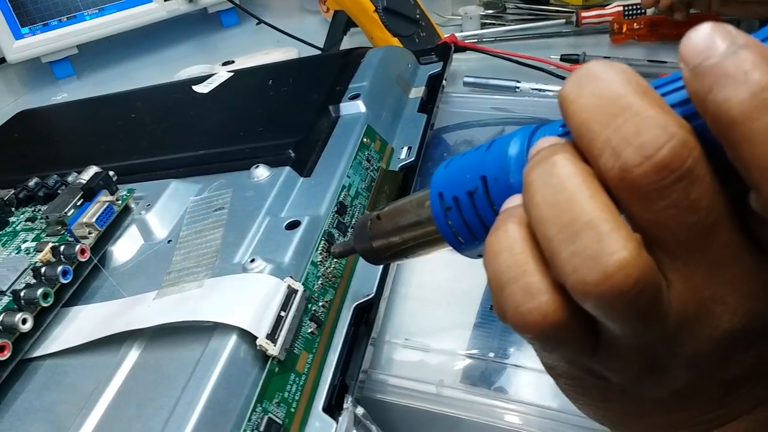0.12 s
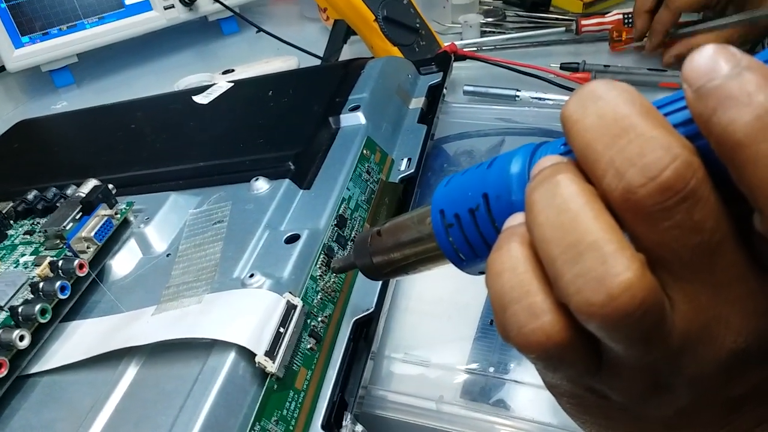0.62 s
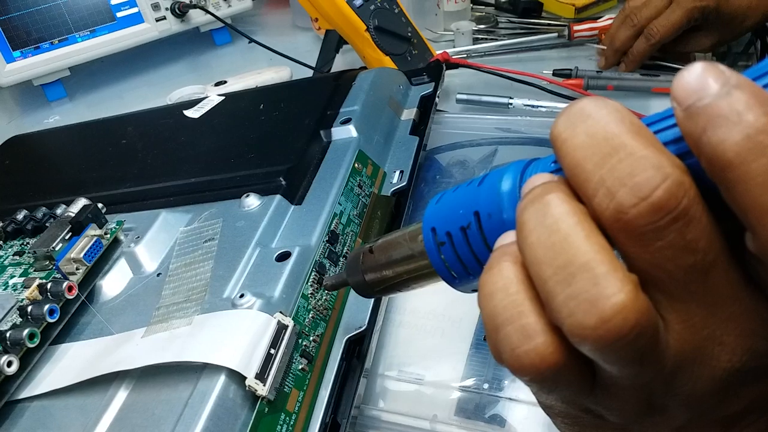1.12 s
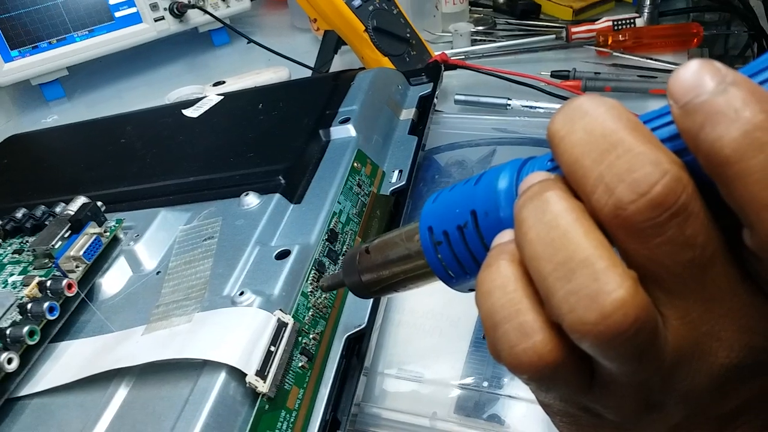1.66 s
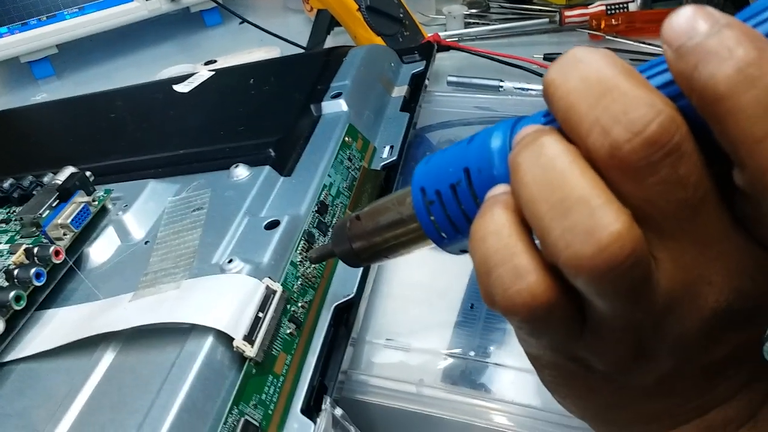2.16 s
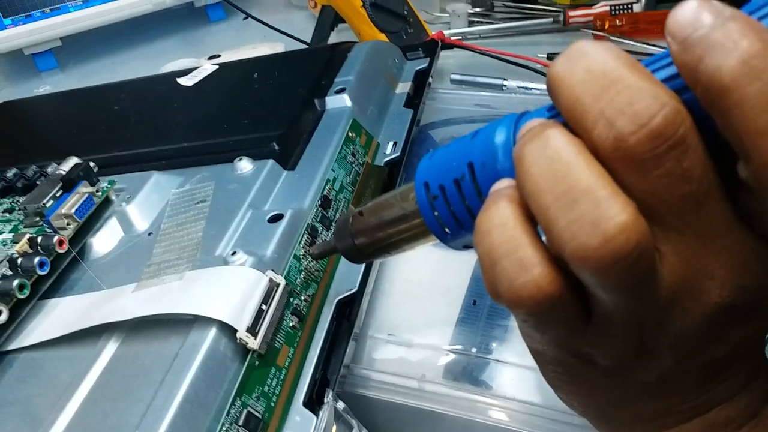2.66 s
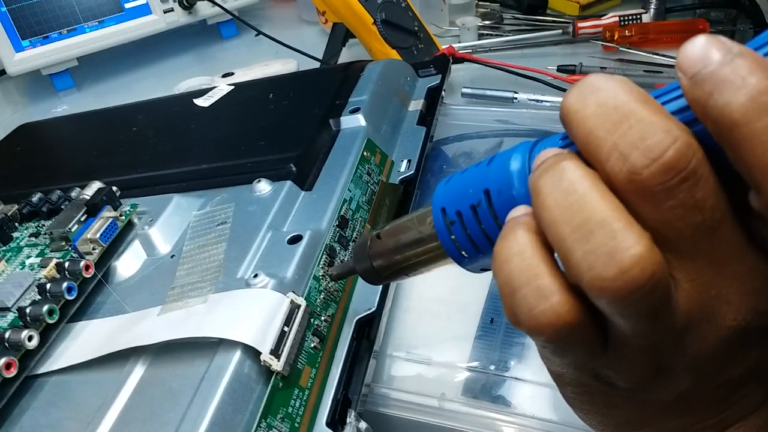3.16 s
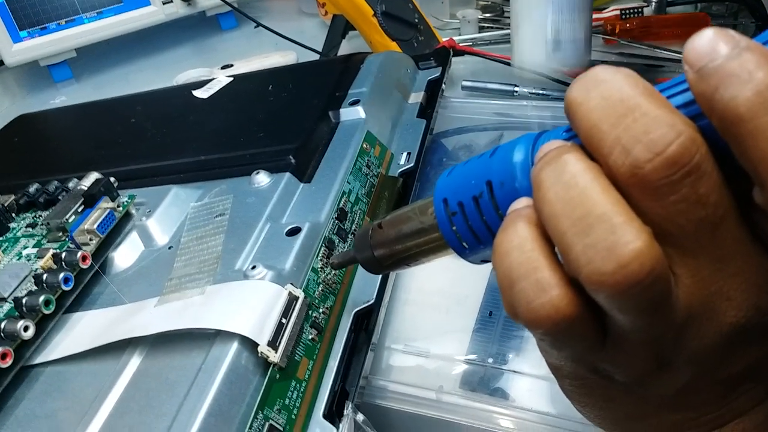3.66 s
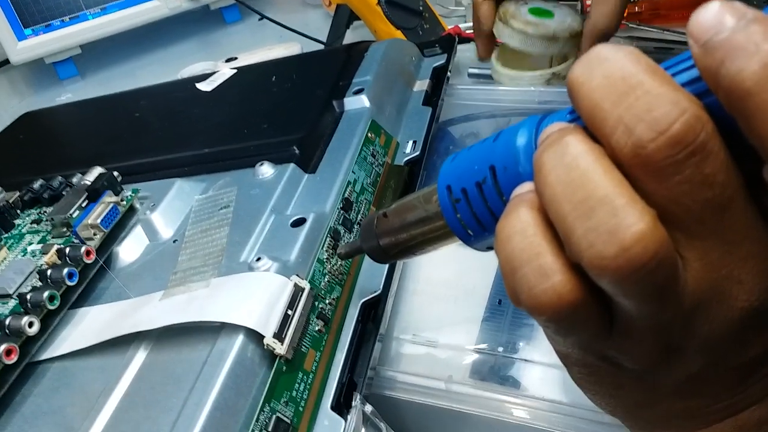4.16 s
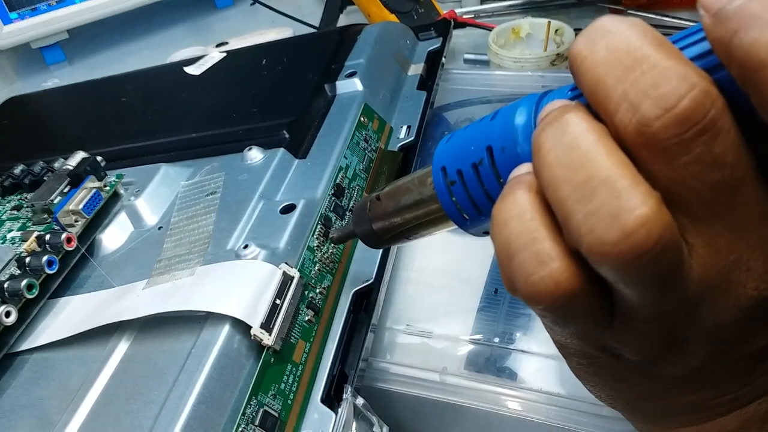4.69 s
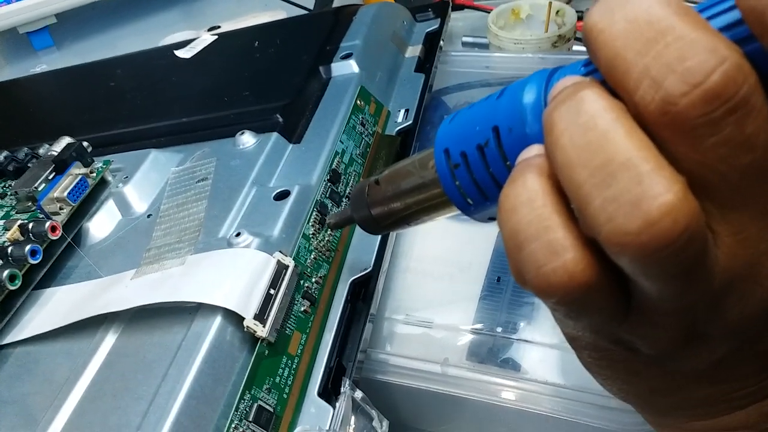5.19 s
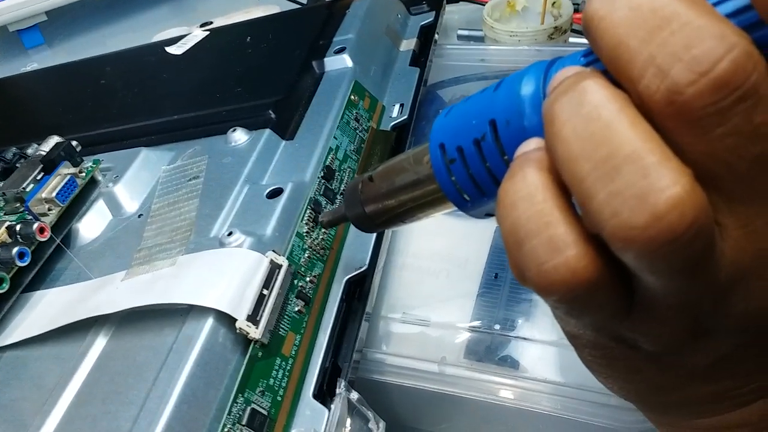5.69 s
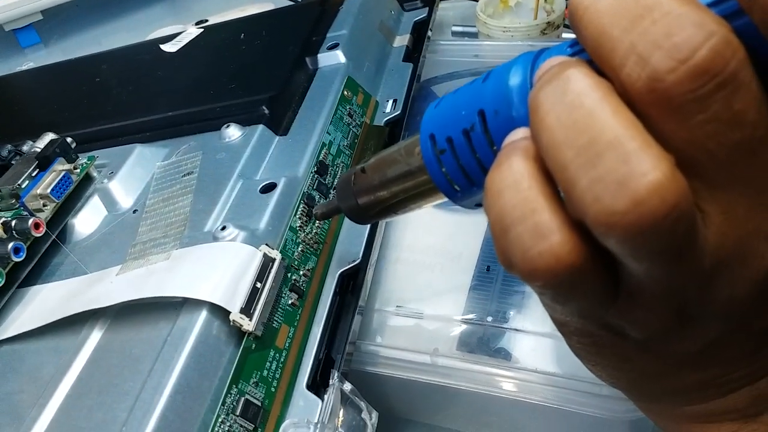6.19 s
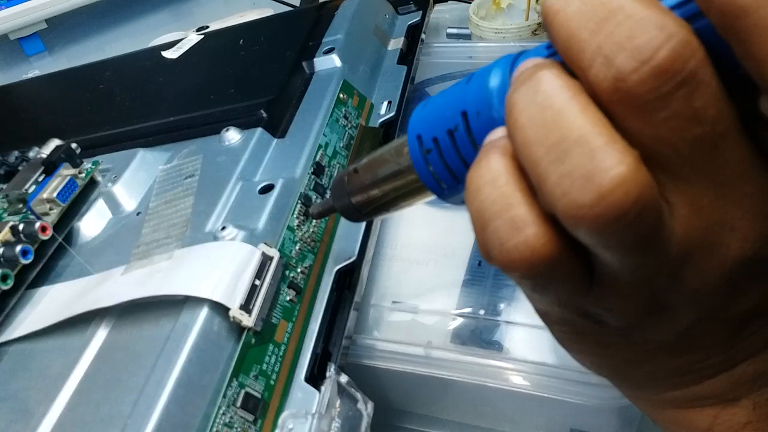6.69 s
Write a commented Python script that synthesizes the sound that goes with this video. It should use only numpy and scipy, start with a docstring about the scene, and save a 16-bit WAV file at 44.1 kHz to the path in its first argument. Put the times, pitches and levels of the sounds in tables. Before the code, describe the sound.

Quiet constant airy hiss with a thin motor whine; one bright metal clatter, soft sliding and ticks, later hollow plastic knocks indoors.

```python
"""A hot air gun hisses throughout: noise for its jet, noise in narrow bands for its whistles, sines for its motor.
From 0.24 s a steel tool is picked up; near 0.93 s it clatters, as noise bursts and rattling touches that ring it.
From about 1.6 s things slide over the bench as swelling noise; near 2 s one drags, and from 2.57 s small ticks sound.
At 3.9 s a plastic jar is set down and at 4.9 s its lid is handled: bursts that ring the modes, each with rebounds.
Two microphone ports in a small room hear it all; the left is mostly duller, weaker and a little later."""
import sys
import numpy as np
from scipy import signal
from scipy.fft import rfft, irfft, next_fast_len
from scipy.io import wavfile

SR = 44100
rng = np.random.default_rng(int(sys.argv[2]) if len(sys.argv) > 2 else 0)


def to_wav(sig):
    """Store sig (one row per channel, or 1-D mono) as 16-bit WAV at the path in sys.argv[1].

    Samples outside -1..1 are clipped; the rate is SR.
    """
    pcm = np.clip(np.atleast_2d(sig), -1, 1) * 32767
    pcm = np.round(pcm).astype(np.int16)
    wavfile.write(sys.argv[1], SR, pcm.T)  # frames by channels


def gain_from_db(level_db):
    """Convert decibel levels to linear amplitude factors (20 dB per decade)."""
    decades = np.asarray(level_db, float) / 20
    return 10 ** decades


N = 301101   # length of the scene in samples
LEFT_LAG_S = 0.00018   # how much later the left port hears the shared noise and the motor


def rms_one(x):
    """Scales a sound to an rms of 1."""
    return x / np.sqrt(np.mean(x ** 2) + 1e-20)


def at_hz(points, hz):
    """Reads a curve of (frequency, value) points at any frequency, on a log frequency axis."""
    points_hz, values = np.transpose(points)
    return np.interp(np.log(hz + 1), np.log(points_hz), values)


def coloured(x, gains):
    """Filters a sound with a gain per frequency, given as a function of Hz."""
    size = next_fast_len(x.shape[-1])
    spectrum = rfft(x, size) * gains(np.fft.rfftfreq(size, 1 / SR))
    return irfft(spectrum, size)[..., :x.shape[-1]]


def band(x, low_hz, high_hz):
    """Keeps one range of frequencies."""
    return signal.sosfilt(signal.butter(2, [low_hz, high_hz], "band", fs=SR, output="sos"), x)


def without_bass(x, cut_hz, order=2):
    """Weakens everything below the cut."""
    return signal.sosfilt(signal.butter(order, cut_hz, "high", fs=SR, output="sos"), x)


def drift(rate_hz):
    """A slow random wander with a spread of about 1, made from 40 smoothed random points a second."""
    knots = rng.standard_normal(int(N / SR * 40) + 2)
    memory = np.exp(-2 * np.pi * rate_hz / 40)
    smooth = rms_one(signal.lfilter([1], [1, -memory], knots))
    return np.interp(np.arange(N) * 40 / SR, np.arange(len(knots)), smooth)


def swells(rows):
    """Sum of gains that each climb 20 dB in a rise time and drop 20 dB in a fall time (2 ms at least)."""
    t = np.arange(N) / SR
    total = 0
    for s, db, rise_s, fall_s in rows:
        before, after = (s - t) / max(rise_s, 0.002), (t - s) / max(fall_s, 0.002)
        total = total + gain_from_db(db - 20 * np.maximum(before, after))
    return total


def placed(x, left_db, lag_s):
    """Straight path to the ports: the left one hears the sound weaker and later."""
    return np.array([gain_from_db(left_db) * np.roll(x, round(lag_s * SR)), x])


# how alike noise is at the two ports: (frequency [Hz], share of the power common to both [0-1])
PORT_LIKENESS = [(60, 0.84), (150, 0.79), (400, 0.77), (1000, 0.88), (2500, 0.11), (6000, 0.11),
                 (15000, 0.1)]


def two_ports(size):
    """Noise at both ports: a common share, late on the left, plus a share of each port's own."""
    common, own = rng.standard_normal(size), rng.standard_normal((2, size))

    def share(hz):
        return np.clip(at_hz(PORT_LIKENESS, hz), 0, 1)

    def late(hz):
        return np.sqrt(share(hz)) * np.exp(-2j * np.pi * hz * [[LEFT_LAG_S], [0]])

    return coloured(common, late) + coloured(own, lambda hz: np.sqrt(1 - share(hz)))


# tone colour of the air jet: (frequency [Hz], relative level per Hz [dB])
JET_COLOUR = [(30, -40), (55, -12.5), (113, -13.5), (257, -14), (450, -6.5), (1100, -4.5), (1650, -5.5),
              (2040, -14.5), (3200, -7.5), (3800, -4), (4700, -12), (6000, -13.5), (11000, -24),
              (15800, -29.5)]
# slow swell of the jet's hiss: (time [s], level [dB])
JET_LEVEL = [(0, -54), (1.5, -55.5), (3.5, -56), (5.3, -53.5), (6.83, -55.5)]
# nozzle resonances blown by the jet: (frequency [Hz], width [Hz], level [dB])
NOZZLE_WHISTLES = [(111.4, 48, -73.5), (2679, 296, -57.5), (4200, 630, -65.5), (6700, 600, -65.5),
                   (9770, 300, -81), (10520, 260, -77.5)]


def jet():
    """Turbulent air is smooth noise; in each nozzle resonance it becomes a wavering whistle."""
    s, db = np.transpose(JET_LEVEL)
    swell_db = np.interp(np.arange(N) / SR, s, db)
    hiss = rms_one(coloured(two_ports(N), lambda hz: gain_from_db(at_hz(JET_COLOUR, hz))))
    out = gain_from_db(swell_db + 0.8 * drift(2.2)) * hiss
    air = two_ports(N)
    for centre_hz, width_hz, db in NOZZLE_WHISTLES:
        blown = coloured(air, lambda hz: 1 / (1 + (2 * (hz - centre_hz) / width_hz) ** 2))
        out += gain_from_db(db + 1.8 * drift(7.9)) * rms_one(blown)
    return out


# rotor and blade tones of the blower motor: (frequency [Hz], level [dB])
MOTOR_TONES = [(107.5, -82.5), (1287, -117), (1717, -68.5), (2143, -70), (2573, -68), (3542, -63),
               (6697, -78)]


def motor():
    """Rotor and blades hum as sines that share one slightly wandering speed."""
    clock = np.cumsum(1 + 0.0011 * drift(0.464)) / SR - np.array([[LEFT_LAG_S], [0]])
    out = np.zeros((2, N))
    for hz, db in MOTOR_TONES:
        tone = np.sin(2 * np.pi * (hz * clock + rng.random()))
        out += np.sqrt(2) * gain_from_db(db + 1.7 * drift(3.8)) * tone
    return gain_from_db([[-5.0], [0]]) * out   # the motor sits on the right


def ring(clicks, hz, t60_s):
    """A resonance: each unit click starts a sine of about height 1 that fades by 60 dB in t60."""
    r, w = gain_from_db(-60 / (t60_s * SR)), 2 * np.pi * hz / SR
    return signal.lfilter([0, np.sin(w)], [1, -2 * r * np.cos(w), r * r], clicks + 1e-18)


# four ranges of a contact, in order thud, knock, clack, clink: (low edge [Hz], high edge [Hz])
CONTACT_RANGES = [(260, 600), (600, 1250), (1400, 5500), (7500, 15500)]


def struck(hits, modes, crack_s, ring_db):
    """Each contact is a gritty burst in four ranges that builds and fades, and rings the modes of each range."""
    size = 6000
    out, t = np.zeros(N), np.arange(size) / SR
    tops_hz = [high for low, high in CONTACT_RANGES]
    for s, hit_db, *range_db in hits:
        burst = rng.standard_normal(size) * t * np.exp(-t / crack_s)
        start = round(s * SR)
        here = slice(start, start + size)
        for (low, high), db in zip(CONTACT_RANGES, range_db):
            crack = band(band(burst, low, high), low, high)
            out[here] += gain_from_db(hit_db + db) * crack / np.abs(crack).max()
        for hz, mode_db, t60_s in modes:
            tone = ring(burst, hz, t60_s)
            db = range_db[np.searchsorted(tops_hz, hz)] + mode_db + ring_db
            luck_db = 3.5 * rng.standard_normal()   # no two contacts ring alike
            out[here] += gain_from_db(hit_db + db + luck_db) * tone / np.abs(tone).max()
    return out


# steel tool contacts: (time [s], level [dB], heft: extra for the three lower ranges [dB])
TOOL_CONTACTS = [(.243, -56, 3), (0.917, -27, -23), (.927, -5, 2), (.939, -26, -12), (.974, -10.5, 1),
                 (1.105, -38.5, 17)]
# a plain contact of the tool: relative level of thud, knock, clack, clink [dB]
TOOL_RANGES = [-31, -15.5, -12, 0]
# ringing modes of the steel tool: (frequency [Hz], relative level [dB], time to fade 60 dB [s])
TOOL_MODES = [(257, -0.5, 0.078), (795, -4, 0.082), (5500, -11, 0.038), (6060, -15, 0.039),
              (9000, -2, 0.11), (9300, -21, 0.059), (10000, -12, .06), (10780, -4, .07), (10600, -17, .07),
              (11000, 1.5, 0.055), (11610, -28, 0.064), (11840, -22.5, .1), (13300, -10, 0.0395),
              (13960, -19, .06)]


def tool_contacts():
    """The steel tool is struck: short bursts set its modes ringing."""
    hits = []
    for s, db, heft_db in TOOL_CONTACTS:
        hits.append((s, db, *(TOOL_RANGES + heft_db * np.array([1, 1, 1, 0]))))
    return struck(hits, TOOL_MODES, crack_s=0.0015, ring_db=-15.5)


# how long the room rings: (frequency [Hz], time to fade 60 dB [s])
ROOM_FADE = [(100, 0.49), (500, 0.31), (3000, 0.3), (8000, 0.17), (15000, 0.22)]


def room(x):
    """Walls return dense reflections: noise that builds up quickly and dies away at its own pace in each band."""
    t, noise, echo = np.arange(SR // 2) / SR, two_ports(SR // 2), 0
    edges_hz = np.append(60 * 2 ** np.arange(8), 17000)
    for low, high in zip(edges_hz, edges_hz[1:]):
        fade_s = at_hz(ROOM_FADE, np.sqrt(low * high))
        echo = echo + band(noise, low, high) * gain_from_db(-60 * t / fade_s)
    echo = echo * (1 - np.exp(-t / 0.0014))
    echo = echo / np.sqrt(np.sum(echo ** 2) / 2)
    return signal.oaconvolve(x[None], echo, axes=1)[:, :N]


# the tool rattles among other tools: (time [s], level [dB], rise [s], fall [s]), each over 20 dB
RATTLE_SWELLS = [(.932, -26.5, 0.017, 0.097), (1.04, -50.5, .15, 0.053), (1.11, -47.5, 0.025, 0.014)]
# the only stretch with rattling touches: start [s], end [s]
RATTLE_SPAN = (.918, 1.14)
# tone colour of the crash: (frequency [Hz], relative level per Hz [dB])
CRASH_COLOUR = [(100, 6), (250, -24), (800, 0.5), (1500, 10), (3000, 4), (5000, 10.5), (8000, 12.5),
                (11000, -9.5), (16000, 8)]


def rattle():
    """Dense uneven touches are heard as a crash and through the modes of the tool."""
    touches_per_s, ring_db = 6700, -33.0
    start, stop = (round(s * SR) for s in RATTLE_SPAN)
    size = stop - start
    happens = rng.random(size) < touches_per_s / SR
    strength = gain_from_db(2.2 * np.minimum(rng.exponential(1, size), 3))
    touches = np.zeros(N)
    touches[start:stop] = rms_one(happens * strength * rng.choice([-1, 1], size))
    touches *= swells(RATTLE_SWELLS)
    out = coloured(touches, lambda hz: gain_from_db(at_hz(CRASH_COLOUR, hz)))
    for hz, db, t60_s in TOOL_MODES:
        out = out + gain_from_db(db + ring_db) * ring(touches, hz, t60_s)
    return out


def gripped(tool):
    """A hand closes on the tool: from 0.93 s its sound sinks by 4.5 dB within 15 ms."""
    grip = np.clip((np.arange(N) / SR - 0.93) / 0.015, 0, 1)
    return tool * gain_from_db(-4.5 * grip)


# things sliding and scuffing over the bench: (time [s], level [dB], rise [s], fall [s]), each over 20 dB
SLIDE_SWELLS = [(1.61, -65.5, 0.057, 0.18), (1.694, -55.5, 0.11, 0.14), (1.87, -60, 0.13, 0.16),
                (2.202, -58.5, .11, 0.1), (2.578, -56, 0.023, 0.066), (2.9, -66.5, 0.25, 0.33),
                (2.98, -59.5, 0.034, .15), (3.158, -53.5, 0.05, 0.077), (3.93, -68.5, 0.022, .3),
                (4.02, -62, 0.24, 0.055), (4.964, -47, 0.014, 0.088)]
# tone colour of the sliding: (frequency [Hz], relative level per Hz [dB])
SLIDE_COLOUR = [(100, -7), (500, 1.5), (1400, -2), (2700, 2), (5000, 3), (8000, -4), (10300, -7.5),
                (13000, -11), (16000, -14)]


def slides():
    """Friction is swishing noise that swells and fades with each movement."""
    grit = coloured(two_ports(N), lambda hz: gain_from_db(at_hz(SLIDE_COLOUR, hz)))
    grit /= np.std(band(grit, 8500, 14000))   # the levels count in this treble range
    return swells(SLIDE_SWELLS) * grit


# scrape of a heavier drag: (time [s], level [dB], rise [s], fall [s]), each over 20 dB
SCRAPE_SWELLS = [(1.88, -60, .04, .2), (1.985, -56, .2, 0.035), (2.154, -67, 0.085, .12)]
# the bench shaking under it: (time [s], level [dB], rise [s], fall [s]), each over 20 dB
RUMBLE_SWELLS = [(1.985, -56.5, 0.19, 0.38)]


def drag():
    """A heavier thing scrapes in the middle range and shakes the bench in a lower, longer rumble."""
    shake = two_ports(N)
    scrape = swells(SCRAPE_SWELLS) * rms_one(band(shake, 480, 960))
    rumble = swells(RUMBLE_SWELLS) * rms_one(band(shake, 97, 320))
    return scrape + rumble


# dry ticks of a small part: (time [s], level [dB])
TICK_TIMES = [(2.569, -26.5), (2.574, -42), (2.979, -41)]
# a tick: relative level of thud, knock, clack, clink [dB]
TICK_RANGES = [-26.5, -17.5, -17.5, 1]


def ticks():
    """A small part makes very short, mostly bright bursts without any ringing."""
    hits = [(s, db, *TICK_RANGES) for s, db in TICK_TIMES]
    return struck(hits, [], crack_s=0.00026, ring_db=0)


def rocking(blows, loss_above_db):
    """A blow and two rebounds, strongest near the range of its hardness, weaker and softer each time."""
    loss_below_db, bench_thud_db, clink_db = 11.5, -21.5, -39   # plastic hardly clinks
    rows, ranges = [], np.arange(3)
    for s, db, hardness, loss_db, softening in blows:
        for k in range(3):
            away = ranges - (hardness - k * softening)
            range_db = np.where(away < 0, loss_below_db * away, -loss_above_db * away)
            range_db[0] = max(range_db[0], bench_thud_db)   # even a hard blow shakes the bench this much
            rebound_s = 0.0117 * k * 0.95 ** k
            rows.append((s + rebound_s, db - k * loss_db, *range_db, clink_db))
    return rows


# the jar is set down: (time [s], level [dB], hardness [0 thud, 1 knock, 2 clack],
# loss per rebound [dB], softening per rebound [steps of hardness])
JAR_SET_DOWN = [(3.926, -20, 0.84, 7.5, 0.43), (4.167, -39.5, 0.8, 5.5, .1)]
# ringing modes of jar and bench: (frequency [Hz], relative level [dB], time to fade 60 dB [s])
JAR_MODES = [(104, 4.5, 0.096), (291, -3, 0.07), (389, -2, 0.053), (528, 3, 0.056), (720, -6, 0.025),
             (796, 3, 0.046), (906, -3.5, 0.04), (2820, 10, 0.0062)]


def jar():
    """The plastic jar rocks as it lands and rings together with the bench."""
    hits = rocking(JAR_SET_DOWN, loss_above_db=5.5)
    knocks = struck(hits, JAR_MODES, crack_s=0.0015, ring_db=-7)
    return without_bass(knocks, 190)   # removes bass that spills from the onsets of the resonators


# the lid is knocked and laid down: (time [s], level [dB], hardness [0 thud, 1 knock, 2 clack],
# loss per rebound [dB], softening per rebound [steps of hardness])
LID_KNOCKS = [(4.856, -25, 1.62, 16, 0.27), (4.954, -22.5, 2.08, 3.2, 0.45), (5.141, -30, 1.5, 4.3, 0.077),
              (5.199, -31, 1.85, 5.3, .4)]
# ringing modes of lid and bench: (frequency [Hz], relative level [dB], time to fade 60 dB [s])
LID_MODES = [(293, 10.5, 0.088), (764, 5, 0.049), (935, -1.5, 0.04), (2520, -4, 0.026), (2804, 6.5, 0.0078),
             (4660, -3, 0.0052)]


def lid():
    """The lid bounces with harder, brighter knocks than the jar and rings together with the bench."""
    hits = rocking(LID_KNOCKS, loss_above_db=3)
    knocks = struck(hits, LID_MODES, crack_s=0.0011, ring_db=-9.5)
    return without_bass(knocks, 200)   # removes bass that spills from the onsets of the resonators


def scene():
    """Adds the handled objects, straight and by way of the room, to the air gun and the sliding."""
    tool = gripped(tool_contacts() + rattle())
    small_part = ticks()
    plastic = jar() + lid()
    direct = placed(tool, -1.6, 0.00083) + placed(small_part, -11.0, 0.0003) + placed(plastic, -1.6, 0.00012)
    echoes = room(gain_from_db(-1.5) * tool + gain_from_db(-8.5) * small_part + gain_from_db(-2.0) * plastic)
    objects = without_bass(direct + echoes, 90, order=4)   # weakens sub-bass that leaks from the resonators
    return jet() + motor() + objects + slides() + drag()


def roll_off(x):
    """The treble ends steeply here."""
    return signal.sosfilt(signal.butter(12, 16800, fs=SR, output="sos"), x)


# treble balance of the whole mix, with a steep drop above 15.7 kHz: (frequency [Hz], gain [dB])
TREBLE_BALANCE = [(4000, -1.5), (5500, -8.5), (6700, -3.5), (7900, -5), (9300, 3.5), (11500, 2.5),
                  (13000, -2), (15700, -3), (15900, -28)]
# how the ports differ: (frequency [Hz], left above right [dB])
LEFT_ABOVE_RIGHT = [(60, -4.5), (200, -4.5), (500, -5), (1200, -7.5), (2000, -7), (2740, -4), (4200, -2),
                    (5500, -2.5), (6700, 6.5), (7900, 9.5), (9000, -3), (11000, -9), (15000, -6)]


def record(dry):
    """Shapes the treble of the mix, gives each port half of their difference and cuts the deep bass."""
    halves = np.array([[0.5], [-0.5]])
    ports = coloured(dry, lambda hz: gain_from_db(at_hz(TREBLE_BALANCE, hz) + at_hz(LEFT_ABOVE_RIGHT, hz) * halves))
    mix = without_bass(ports, 45)
    return roll_off(mix)


dry = scene()
out = record(dry)
to_wav(out)
```